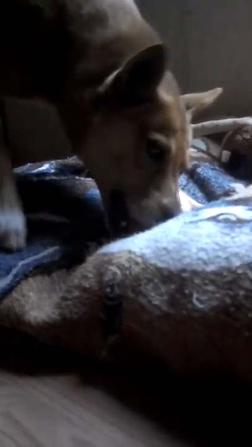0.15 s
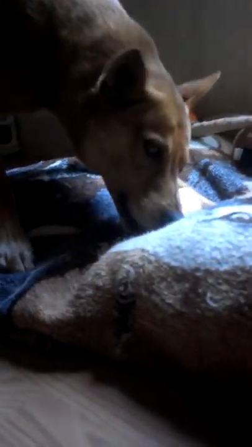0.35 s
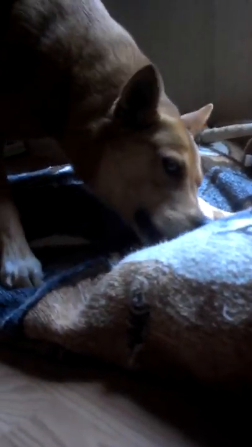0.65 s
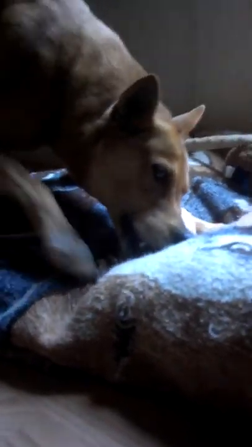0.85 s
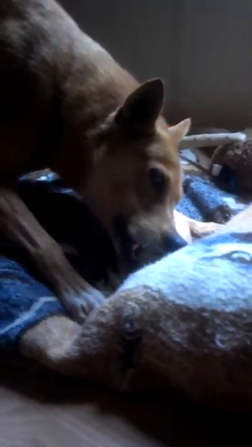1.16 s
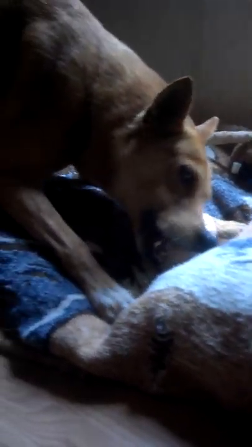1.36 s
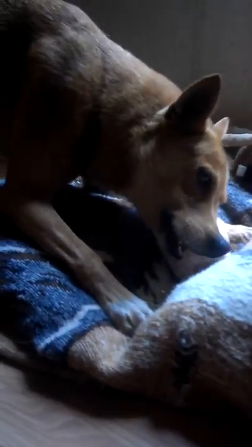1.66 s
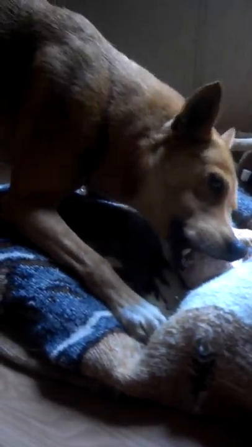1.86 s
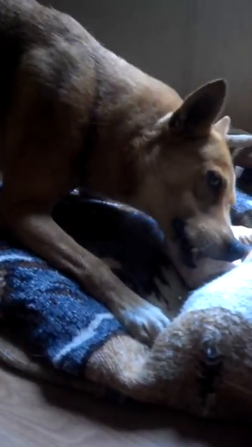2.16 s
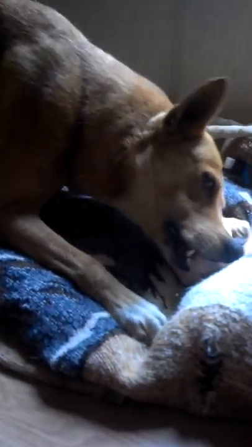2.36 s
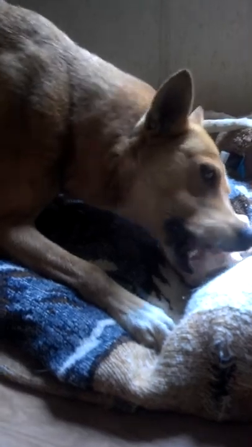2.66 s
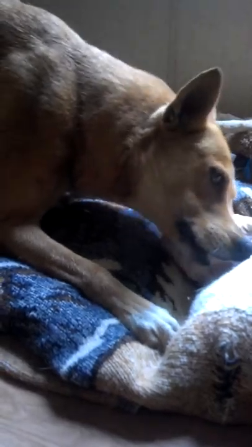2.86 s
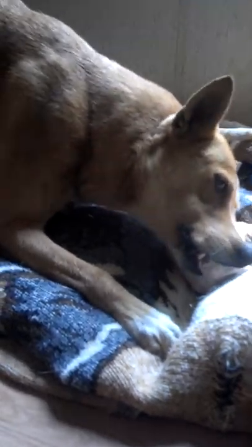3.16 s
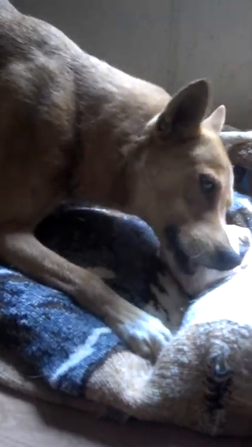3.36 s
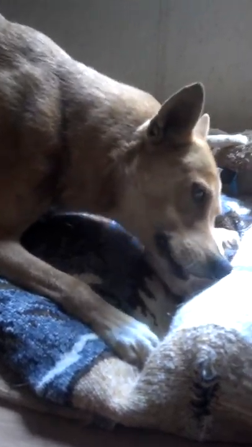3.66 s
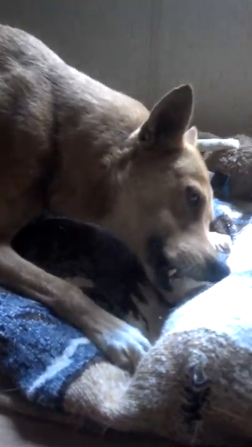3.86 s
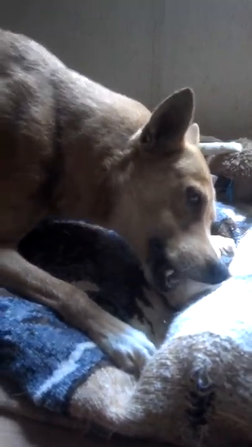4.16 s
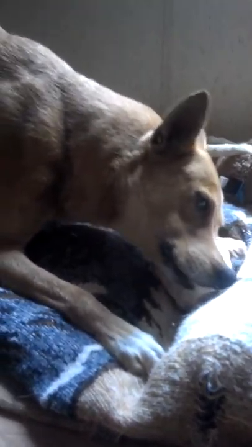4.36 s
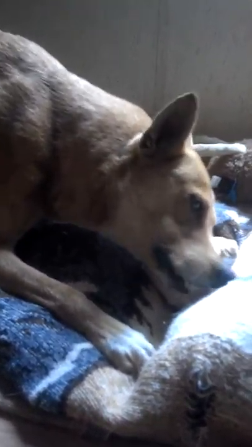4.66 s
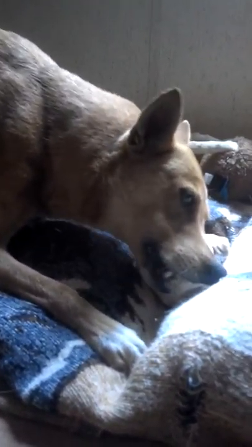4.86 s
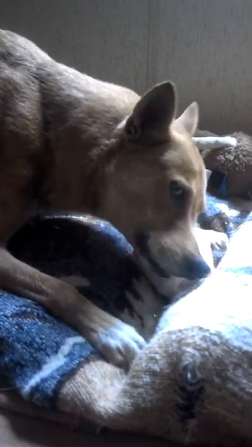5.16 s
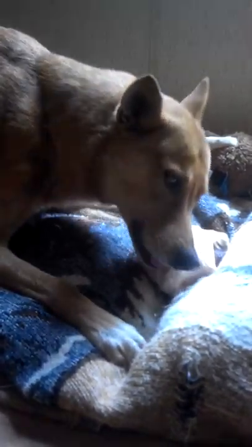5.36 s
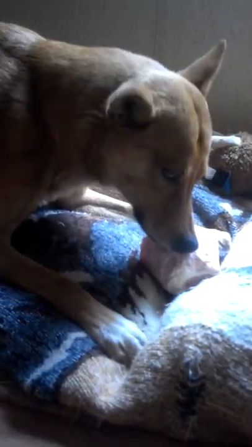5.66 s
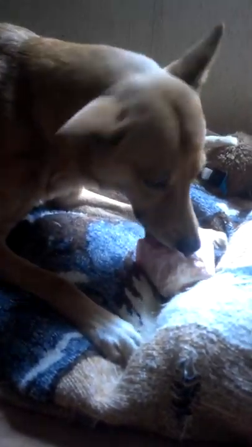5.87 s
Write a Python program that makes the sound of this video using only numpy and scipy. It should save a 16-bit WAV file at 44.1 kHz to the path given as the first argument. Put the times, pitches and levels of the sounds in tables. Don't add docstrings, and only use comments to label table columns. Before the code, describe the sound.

A phone close to a dog on a blanket catches hard teeth slipping and snapping on bone. Low muffled rustling comes first, then irregular bright clicks with dry woody knocks, the loudest around one and a half and just before two and a half seconds. Clicking continues in small uneven bursts, then eases into a soft rub of cloth. Motor hum and airy hiss stay constant in the small indoor space.

```python
import sys
import numpy as np
from scipy import signal
from scipy.fft import rfft, irfft, next_fast_len
from scipy.io import wavfile
from scipy.ndimage import uniform_filter1d, minimum_filter1d

SR = 44100
rng = np.random.default_rng(int(sys.argv[2]) if len(sys.argv) > 2 else 0)


def master(y):
    cut = np.clip(np.atleast_2d(y).T, -1, 1)
    pcm = np.round(cut * 32767)
    wavfile.write(sys.argv[1], SR, pcm.astype(np.int16))


def magnitude_from_level(level_db):
    exponent = np.asarray(level_db, float) / 20
    return 10 ** exponent


N = 265041

# (pitch [Hz], level per Hz [dB])
AIR_COLOUR = [(30, -44), (80, -22), (130, 10.5), (280, 1), (500, 0), (900, -5), (1600, -8.5), (1900, -9.5),
              (2600, -8.5), (3600, -17.5), (4900, -11.5), (5900, -22), (7100, -9.5), (8300, -15),
              (9800, -19.5), (12000, -22.5)]
# (time [s], level [dB])
AIR_SWELL = [(0, 1), (.3, 2.5), (.9, 2.5), (1.5, 4), (3, 6.5), (4.8, 2), (5, 8), (5.2, 2), (5.85, 1),
             (5.95, 2.5), (6.01, 0)]
# (pitch [Hz], likeness [0 to 1])
PORT_LIKENESS = [(60, 1), (150, 1), (350, 0.71), (800, 0.32), (2000, 0.027), (6000, 0.072)]
# (pitch [Hz], level [dB])
MOTOR_TONES = [(59.6, -62), (119.8, -39.5), (179.6, -49), (239.5, -54.5), (258, -52), (299.5, -58.5),
               (582, -60), (1471, -64)]
# (middle time [s], length [s], level [dB], pitch [Hz], width [Hz])
RUSTLES = [(.42, 0.48, -43.5, 257, 57), (.3, 1, -47.5, 430, 123), (0.32, 0.021, -58, 880, 150),
           (0.425, 0.02, -47, 1000, 300), (0.82, 0.64, -44, 255, 31), (4.5, 0.017, -57, 1100, 870),
           (2.8, 0.012, -43, 2340, 1500), (1.615, 0.06, -47, 3600, 1400), (3.565, 0.038, -44, 2900, 500),
           (2.405, 0.04, -43, 1450, 400), (4, 0.13, -68, 490, 200), (5.3, 0.1, -46.5, 620, 270),
           (5.95, 0.068, -40.5, 490, 110), (5.942, 0.036, -44.5, 840, 2700)]
# (time [s], bone wall level [dB], enamel level [dB], enamel pitch [Hz])
SNAPS = [(.057, -33, -45, 7840), (.867, -29.5, -60, 7700), (0.872, -41, -58, 7800),
         (1.3052, -30.5, -46, 7850), (1.311, -35, -35.5, 7640), (1.3149, -35, -50, 7800),
         (1.348, -41, -45, 7900), (1.4117, -39, -48, 7800), (1.5724, -25, -36, 7700),
         (1.582, -28, -22, 7940), (1.752, -57, -37, 7240), (1.762, -35, -44, 8300), (1.765, -32, -38, 7100),
         (1.7673, -47, -33, 8000), (1.7706, -37, -46, 8350), (1.7775, -46, -37, 8300),
         (1.839, -42, -49, 7800), (1.862, -52, -40, 8000), (2.173, -44, -41, 8000),
         (2.1802, -37, -35, 7900), (2.184, -26, -23, 6800), (2.194, -47, -41, 7000),
         (2.339, -50, -52, 7800), (2.354, -42, -49, 7500), (2.369, -36, -31.5, 9350),
         (2.3814, -42, -28.5, 7300), (2.584, -43, -36.5, 9200), (2.5862, -31, -37, 8300),
         (2.7313, -33, -42, 7200), (2.735, -34, -33.5, 7070), (2.752, -44, -42, 8100),
              (2.9569, -40, -35.5, 6500), (2.9616, -37.5, -51, 7800), (3.143, -50, -55, 8000),
              (3.158, -29, -27, 8700), (3.386, -38, -52, 7220), (3.4855, -53, -39, 7560),
              (3.5296, -40, -45, 8400), (3.5407, -32, -25, 7460), (3.544, -44, -25.5, 9000),
              (3.552, -45, -38, 7000), (3.5596, -48, -30, 7100), (3.7308, -50, -41, 7280),
              (3.7536, -35, -28.5, 7300), (3.7627, -37.5, -45, 7960), (3.8056, -44, -44, 7800),
              (3.821, -37, -40, 7250), (4.105, -44, -39, 7700), (4.1167, -44, -36, 7320),
              (4.15, -50, -42, 7000), (4.188, -43, -43, 7600), (4.2753, -39, -37, 8300),
              (4.423, -47, -57, 7800), (4.4953, -46, -40.5, 8560), (4.497, -33, -25, 8940),
              (4.499, -50, -39, 7240), (4.5065, -52, -36, 7700), (4.7034, -56, -26, 8000),
              (4.8357, -47, -29.5, 6650), (4.847, -51, -36, 8290), (4.852, -50, -38, 8600),
              (4.8755, -52, -27.5, 7070), (4.881, -44, -34, 7300), (4.894, -42, -33, 8460),
              (5.126, -50, -54, 7800), (5.176, -42, -60, 7800), (5.421, -36.5, -31, 7450),
              (5.4227, -53, -37, 7000), (5.425, -39, -34, 7900), (5.694, -47, -42, 7730)]
# (middle time [s], bone wall level [dB], enamel level [dB], crackle length [ms])
CRACKS = [(1.5741, -32, -45, 1.4), (1.582, -43, -35, 1), (1.591, -41, -32.5, 6.5),
          (1.9618, -32.5, -38, 2.5), (1.964, -38, -34.5, 1.6), (1.97, -35, -31, 6.5),
          (2.1717, -36, -31, 0.82), (2.184, -41, -33, 1.2), (2.368, -37, -34, 1.6), (2.379, -37, -30, 1.6),
          (2.389, -40, -37, 4.7), (2.399, -38, -38, 21), (2.428, -52, -36, 2), (2.589, -47, -36, 1.5),
          (2.738, -38, -33, 2), (3.16, -32, -37, 2.3), (3.161, -34, -26.5, 1.4), (3.1643, -43, -27, 1.1),
          (3.173, -40, -37.5, 3.7), (3.394, -34, -33.5, 3.3), (3.5345, -34, -33, 2.9),
          (3.538, -46, -37, 0.99), (3.9192, -32.5, -36.5, 1.5), (4.271, -42, -49, 3.5),
          (4.611, -35, -37.5, 0.86), (5.4176, -41, -40, 0.66), (5.428, -32, -35, 1.1)]
THIN_RIM_BITES = [1.411, 1.572, 1.582, 1.839, 2.587, 3.387, 3.394, 3.535, 3.82, 4.188, 4.424, 4.497, 4.881,
                  5.126, 5.176]
# (pitch [Hz], width [Hz], level [dB])
BONE_WALL = [(1700, 1200, -4), (2550, 500, -5), (3150, 900, 0), (4200, 1000, -12), (5700, 1500, -16),
             (12000, 6000, -17)]
# (multiple of the enamel pitch, width [Hz], level [dB])
ENAMEL = [(1., 1150, 0), (1.3, 2200, -20), (1.62, 3500, -28)]
# (time [s], level [dB], pitch [Hz], time to fade by 60 dB [s])
KNOCKS = [(0.767, -32.5, 1060, 0.012), (0.867, -33, 1090, 0.015), (0.913, -26.5, 1070, 0.0084),
          (1.306, -31, 1090, 0.012), (1.348, -24, 1100, 0.0088), (1.5702, -11, 850, 0.011),
          (1.5804, -22, 847, 0.063), (1.762, -39, 1120, .034), (1.794, -20.5, 1120, 0.0057),
          (1.958, -35, 1090, 0.0092), (1.9608, -24.5, 1180, 0.015), (1.963, -25, 805, 0.063),
          (2.003, -31.5, 850, 0.029), (2.182, -30.5, 1206, 0.025), (2.352, -28, 780, 0.018),
          (2.3597, -23, 1350, 0.01), (2.3664, -32, 222, 0.066), (2.3665, -0.5, 1100, 0.0041),
          (2.3773, -13.5, 1410, 0.014), (2.3815, -18, 810, 0.012), (2.423, -33.5, 850, 0.048),
          (2.5873, -25, 1030, 0.0088), (2.59, -29, 1230, 0.012), (2.603, -24, 1300, 0.0053),
          (2.7285, -36, 690, 0.03), (2.7365, -23.5, 753, 0.015), (3.129, -24.5, 794, 0.009),
          (3.1418, -21, 970, 0.0062), (3.155, -13.5, 820, 0.0053), (3.156, -21, 1590, 0.0089),
          (3.528, -30.5, 800, 0.031), (3.536, -26.5, 800, 0.014), (3.54, -14, 880, 0.0054),
          (3.543, -33, 745, 0.024), (3.76, -36, 1130, 0.024), (3.916, -29, 756, .035),
          (4.2705, -24, 780, 0.01), (4.275, -29, 1320, 0.011), (4.4975, -29.5, 1290, 0.01),
          (4.607, -38, 1320, 0.016), (4.609, -32, 850, 0.033), (4.8932, -27.5, 1140, 0.008)]
# (pitch [Hz], level [dB], time to fade by 60 dB [s])
HOLLOW = [(838, 3, .2), (1390, -9, .06), (790, -4, .14), (890, -6, .12)]
# (pitch [Hz], width [Hz], level [dB])
SPLINTERS = [(850, 420, -34), (1450, 1950, 13)]
# (pitch [Hz], time to fade by 60 dB [s])
ROOM_FADE = [(300, 0.085), (1000, 0.35), (4000, 0.93), (10000, 0.12)]
# (time [s], cut [dB])
GAIN_CUTS = [
    (1.585, 6.5),
    (1.77, 1),
    (1.975, 1.5),
    (2.19, 4),
    (2.39, 1.5),
    (2.74, .5),
    (3.17, 1),
    (3.55, 1),
]
# (pitch [Hz], phase [rad])
FAR_PHASE = [(800, 0), (1700, 1.5), (2800, -.4), (4200, 1.5), (5200, 0), (7000, 0), (7900, 2), (9300, .3),
             (12000, .6)]
# (pitch [Hz], level [dB])
FAR_TONE = [(200, -4.5), (1800, -3.5), (3000, -6.5), (5500, -2), (7000, -3), (8000, 1), (12000, -0.7)]
# (pitch [Hz], from the left, from the right, phase turn [rad])
CROSS = [(100, .88, .88, -.11), (1200, .94, .94, 0), (2500, .97, .96, .1), (3700, .98, .97, 0),
         (4850, .74, .76, 0), (5150, .35, .55, 0), (6400, .9, .25, .9), (7300, 1, .2, .5),
         (8000, .9, .15, 0), (10000, .37, .1, 0), (12000, .15, .1, 0)]


def evened(x):
    return x / np.sqrt(np.mean(x ** 2) + 1e-20)


def peaked(x):
    return x / np.sqrt(uniform_filter1d(x ** 2, size=50).max())


def read(points, hz, column=1):
    rows = np.array(points)
    return np.interp(np.log(hz + 1), np.log(rows[:, 0] + 1), rows[:, column])


def add(mix, s, sound):
    part = mix[round(s * SR):][:len(sound)]
    part += sound[:len(part)]


def resonances(x, modes):
    total = 0
    for k, (hz, width, db) in enumerate(modes):
        peak = signal.iirpeak(hz, hz / width, SR)
        ring = signal.lfilter(*peak, signal.lfilter(*peak, x))
        total = total + (-1) ** k * magnitude_from_level(db) * ring
    return total


def air():
    level_db, top_hz, patch_db = -39.5, 15520, 1.78
    frames, hz = N // 256 + 5, np.fft.rfftfreq(1024, 1 / SR)
    a, b, c, d, patches = rng.standard_normal((frames, 513, 5)).T
    patches = uniform_filter1d(patches, size=10, axis=0)
    patches = evened(uniform_filter1d(patches, size=10, axis=1))
    swell_db = np.interp(np.arange(frames) * 256 / SR, *np.transpose(AIR_SWELL))
    swell_db = swell_db / (1 + (hz[:, None] / 700) ** 2)
    same = np.clip(read(PORT_LIKENESS, hz), 0, 1)[:, None]
    near = a + 1j * b
    far = same * near + np.sqrt(1 - same ** 2) * (c + 1j * d)
    colour = magnitude_from_level(read(AIR_COLOUR, hz)[:, None] + swell_db + patch_db * patches)
    z = np.array([far, near]) * colour * (hz < top_hz)[:, None]
    return magnitude_from_level(level_db) * evened(signal.istft(z, nperseg=1024, noverlap=768)[1][:, :N])


def hum():
    waver_db, pitch_waver = 2.2, 0.00405
    drift = rng.standard_normal((N, 2 * len(MOTOR_TONES)))
    for _ in range(2):
        drift = uniform_filter1d(drift, size=3000, axis=0)
    drift = evened(drift)
    out = np.zeros(N)
    for k, (hz, db) in enumerate(MOTOR_TONES):
        level_db = db + waver_db * (k > 1) * drift[:, 2 * k]
        pitch = hz + pitch_waver * hz * drift[:, 2 * k + 1]
        out += np.sqrt(2) * magnitude_from_level(level_db) * np.sin(2 * np.pi * np.cumsum(pitch) / SR)
    return out


def rustles():
    out = np.zeros(N)
    t = np.arange(SR) / SR - .5
    chance = rng.standard_normal((len(RUSTLES), 2, SR))
    for (s, length, db, hz, width), (grit, gate) in zip(RUSTLES, chance):
        grains = grit * magnitude_from_level(2.0 * evened(uniform_filter1d(gate, size=200)))
        swell = np.exp(-(2 * t / length) ** 2)
        sound = magnitude_from_level(db) * evened(resonances(grains, [(hz, width, 0)])) * swell
        missed = max(round((.5 - s) * SR), 0)
        add(out, max(s - .5, 0), sound[missed:])
    return out


def ticks():
    wall_gain_db, enamel_gain_db = -2, -3
    crack_hz, snap_ms, snap_kick = 7500, .2, 2.2
    wall_spread, enamel_spread, spot_db = .04, .02, 1.2
    out, t = np.zeros(N), np.arange(-300, 800) / SR
    rows = [(*row, crack_hz, 0) for row in CRACKS]
    for s, wall_db, enamel_db, hz in SNAPS:
        rows.append((s, wall_db, enamel_db, snap_ms, hz, snap_kick))
    chance = rng.standard_normal((len(rows), 2, len(t)))
    for (s, wall_db, enamel_db, ms, hz, kick), (grit, gate) in zip(rows, chance):
        slip = np.exp(-abs(t) / (ms / 1000 + 2e-4) * np.where(t < 0, 1, 1.3))
        crumbs = .08 * (t > 0) * np.exp(-abs(t) / .005)
        grains = magnitude_from_level(6 * min(ms, 1) * evened(uniform_filter1d(gate, size=16)))
        crackle = grit * grains * (slip + crumbs) + kick * (t == 0)
        rim = 1.24 if abs(np.array(THIN_RIM_BITES) - s).min() < .004 else 1
        wall_modes = [(f * rim * (1 + wall_spread * gate[k]), width, db + spot_db * grit[k])
                      for k, (f, width, db) in enumerate(BONE_WALL)]
        enamel_modes = [(multiple * hz * (1 + enamel_spread * gate[-1]), width, db)
                        for multiple, width, db in ENAMEL]
        wall = magnitude_from_level(wall_db + wall_gain_db) * peaked(resonances(crackle, wall_modes))
        enamel = magnitude_from_level(enamel_db + enamel_gain_db) * peaked(resonances(crackle, enamel_modes))
        add(out, s + t[0], wall + enamel)
    return out


def knocks():
    hollow_per_s, gripped_s = 3.1, 0.00082
    regrip_s, regrip_pitch = 2.6, .895
    rise_s = .001
    out, t = np.zeros(N), np.arange(SR // 5) / SR
    chance = rng.standard_normal((len(KNOCKS), len(t)))
    for (s, db, hz, t60), grit in zip(KNOCKS, chance):
        fade = t / max(t60, .004)
        ring = np.sin(2 * np.pi * hz * t) * magnitude_from_level(-60 * fade)
        ring += 0.72 * np.sin(2 * np.pi * 1.97 * hz * t) * magnitude_from_level(-130 * fade)
        ring += .15 * evened(resonances(grit, SPLINTERS)) * magnitude_from_level(-40 * fade)
        grip = regrip_pitch if s > regrip_s else 1
        hollow = sum(np.sin(2 * np.pi * f * grip * t) * magnitude_from_level(g - 60 * t / (d * grip ** 4)) for f, g, d in HOLLOW)
        share = np.clip(hollow_per_s * (t60 - gripped_s), 0, 1)
        onset = 1 - np.exp(-t / 6e-4)
        add(out, s + rise_s, -magnitude_from_level(db + 1.5) * (ring + share * hollow) * onset)
    return out


def room(x):
    taps = np.zeros((2, SR // 2))
    at = np.arange(160, SR // 2 - 20, 20)
    at = at + rng.integers(0, 20, (2, len(at)))
    np.put_along_axis(taps, at, rng.choice([-1., 1.], at.shape), 1)
    hz, t, z = signal.stft(taps, SR, nperseg=256)
    fade = magnitude_from_level(-60 * t / read(ROOM_FADE, hz)[:, None])
    tail = signal.istft(z * fade, SR, nperseg=256)[1]
    return signal.fftconvolve(x[None], tail / np.linalg.norm(tail[0]), axes=1)[:, :N]


def cut_db():
    t = np.arange(N) / SR
    cuts = sum(db * (t > s) * np.exp(-abs(t - s) / .33) for s, db in GAIN_CUTS)
    return uniform_filter1d(cuts, size=600)


def scene():
    low = magnitude_from_level(2.0) * knocks() + rustles()
    high = ticks() * magnitude_from_level(cut_db())
    size = next_fast_len(N)
    hz = np.fft.rfftfreq(size, 1 / SR)
    scatter = rng.standard_normal(90) * np.exp(-np.arange(90) / 22)
    scatter = rfft(scatter / np.linalg.norm(scatter), size) * np.clip(hz / 3000, 0, 1)
    path = .8 * np.exp(1j * read(FAR_PHASE, hz)) + .6 * scatter
    far = irfft(rfft(low + high, size) * path, size)[:N]
    echoes = room(magnitude_from_level(-10) * low + magnitude_from_level(-12.5) * high)
    ports = np.array([far, low + high]) + echoes + air() + hum()
    ports[0] = irfft(rfft(ports[0], size) * magnitude_from_level(read(FAR_TONE, hz)), size)[:N]
    return ports


def thin_bands(stereo):
    rough_db, hole_db = -15, -10.2
    both = np.array([stereo[0] + stereo[1], stereo[0] - stereo[1]]) / 2
    z = signal.stft(both, nperseg=2048, noverlap=1024)[2]
    power = uniform_filter1d(abs(z) ** 2, size=7, axis=1)
    keep = minimum_filter1d(1. * (power > magnitude_from_level(-28) * power[::-1]), size=5, axis=1)
    treble = power[:, 120:].sum((0, 1))
    crack = treble > 1.5 * np.median(treble)
    wide = uniform_filter1d(power, size=9, axis=1)
    filled = wide > magnitude_from_level(hole_db) * np.median(wide, axis=2, keepdims=True)
    keep[:, 220:] *= filled[:, 220:]
    rough = crack * magnitude_from_level(rough_db) * np.sqrt(abs(power[::-1])) * np.exp(2j * np.pi * rng.random(z.shape))
    z = z * np.maximum(keep, crack) + rough
    mid, side = signal.istft(z, nperseg=2048, noverlap=1024)[1][:, :N]
    return np.array([mid + side, mid - side])


def band_limit(x):
    return signal.sosfilt(signal.butter(12, 16640, fs=SR, output="sos"), x)


def record(dry):
    cross_s = 4.07e-4
    size = next_fast_len(N)
    hz = np.fft.rfftfreq(size, 1 / SR)
    far, near = rfft(dry, size)
    delay = np.exp(-2j * np.pi * hz * cross_s + 1j * read(CROSS, hz, column=3))
    left = far - read(CROSS, hz, column=1) * delay * near
    right = near - read(CROSS, hz, column=2) * delay * far
    treble_limit = 1 + (hz / 16000) ** 60
    stereo = irfft(np.array([left, right]) / treble_limit, size)[:, :N]
    finished = thin_bands(stereo) / magnitude_from_level(cut_db())
    return band_limit(finished)


dry = scene()
out = record(dry)
master(out)
```